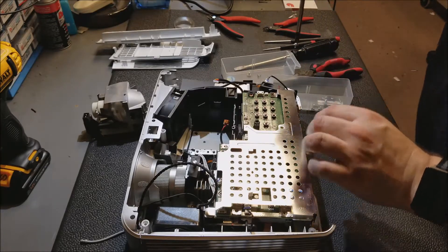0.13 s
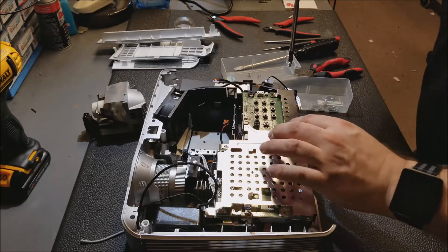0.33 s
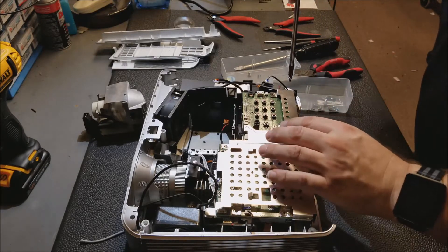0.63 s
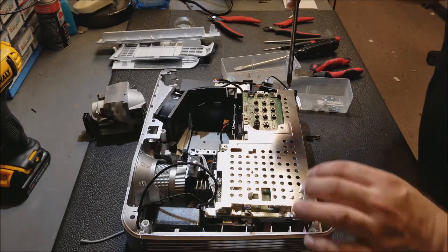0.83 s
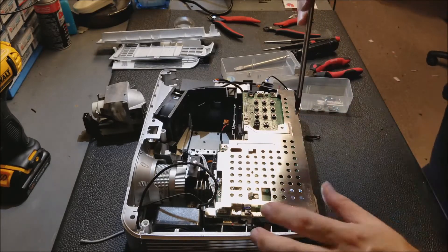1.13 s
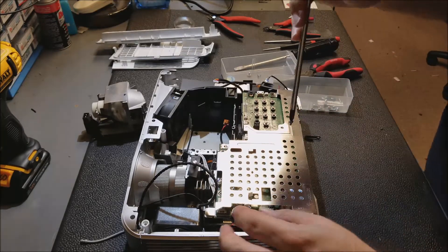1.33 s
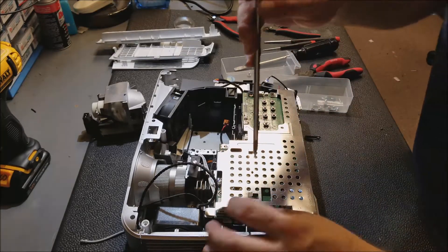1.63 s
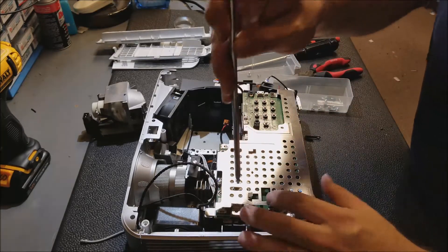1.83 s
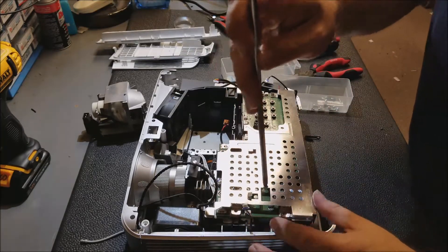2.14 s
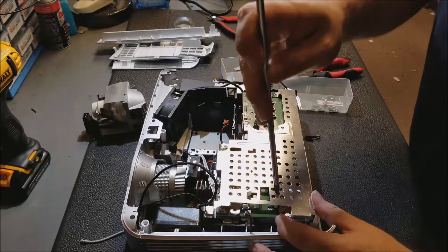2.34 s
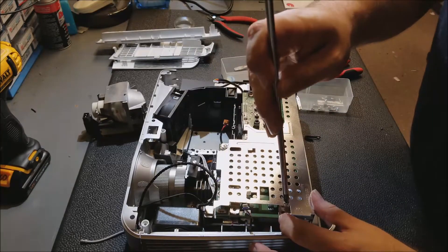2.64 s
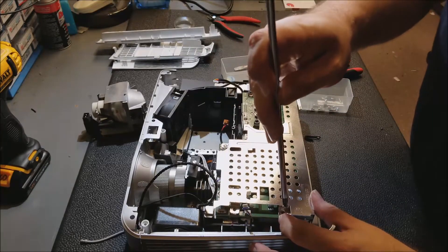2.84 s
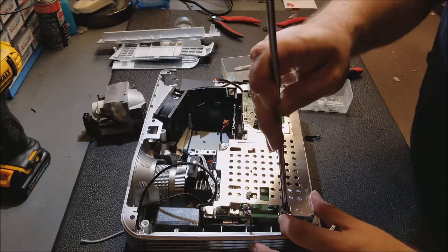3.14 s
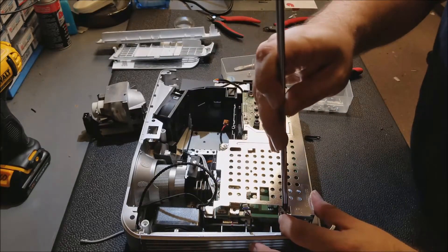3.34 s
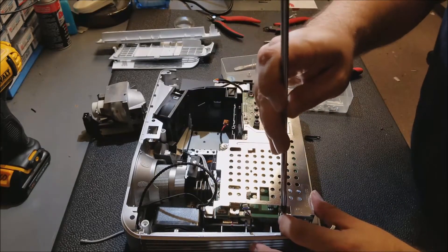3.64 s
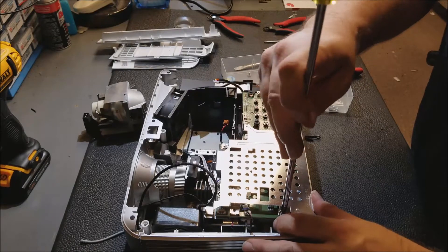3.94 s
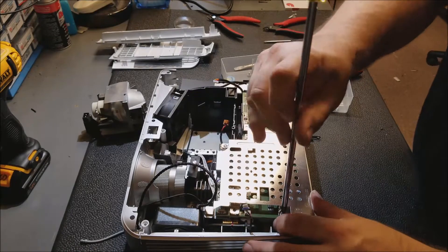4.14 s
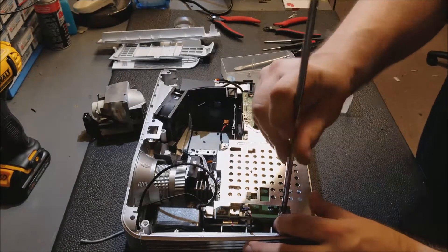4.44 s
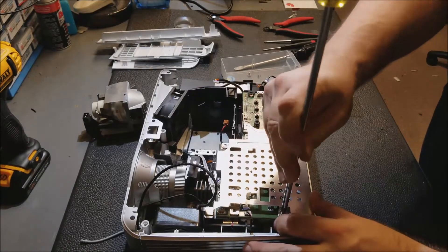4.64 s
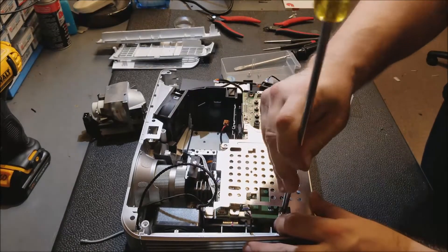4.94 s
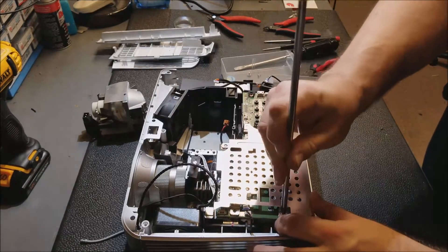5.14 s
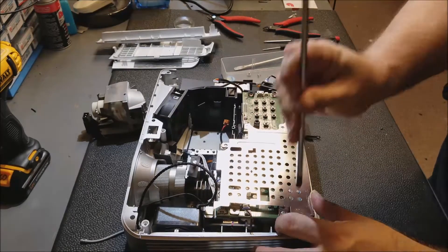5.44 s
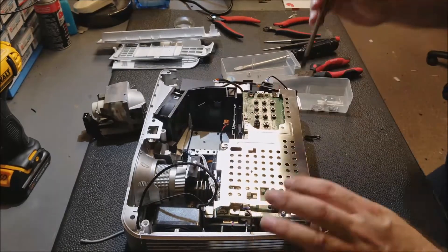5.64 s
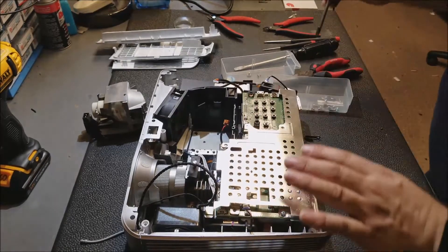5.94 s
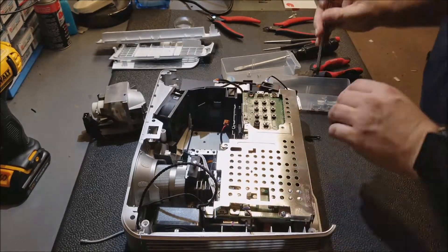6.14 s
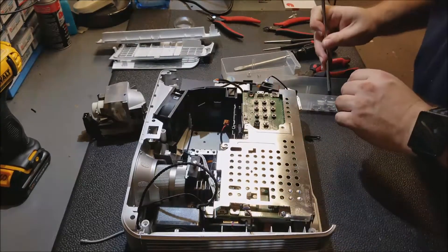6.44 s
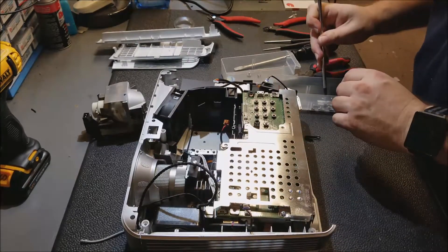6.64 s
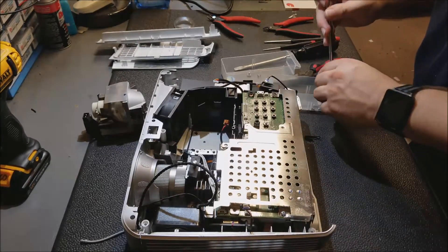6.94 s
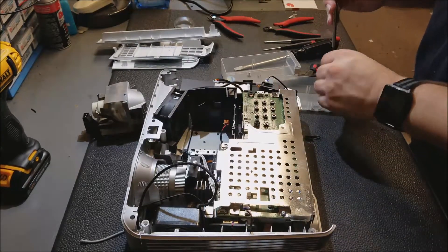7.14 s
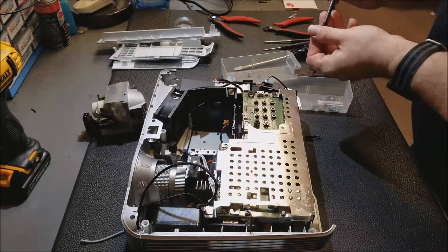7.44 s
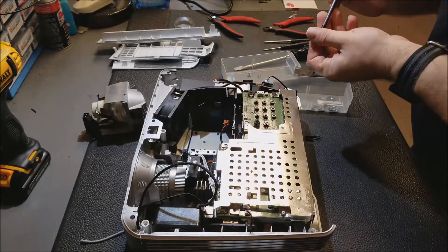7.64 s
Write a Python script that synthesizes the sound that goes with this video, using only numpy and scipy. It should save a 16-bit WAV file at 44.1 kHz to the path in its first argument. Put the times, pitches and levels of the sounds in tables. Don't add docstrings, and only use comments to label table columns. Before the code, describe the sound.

A long screwdriver ticks, scrapes and slips on small screws in a perforated steel cover, with two hard clacks over a low motor hum.

```python
import sys
import numpy as np
from scipy import signal
from scipy.fft import rfft, irfft, next_fast_len
from scipy.io import wavfile
from scipy.ndimage import uniform_filter1d

SR = 44100
rng = np.random.default_rng(int(sys.argv[2]) if len(sys.argv) > 2 else 0)


def output_pcm(signal):
    pcm = np.clip(np.atleast_2d(signal).T, -1, 1) * 32767
    wavfile.write(sys.argv[1], SR, np.round(pcm).astype(np.int16))


def attenuation_scalar(level_db):
    decades = np.asarray(level_db, float) / 20
    return 10 ** decades


N = 342954
t = np.arange(N) / SR


def screwdriver():
    ticks = steel(tick_forces(), damping=1.5)
    rubs = steel(rub_forces(), damping=2.05)
    return ticks + rubs + pings()


# (time [s], peak [dB], housing share [dB], plate share [dB], sizzle share [dB])
CRISP_TICKS = [(0.4497, -53.5, -20, -25, -21), (2.1745, -50, -18, -43, -34), (2.256, -42.5, -11, -20, -15),
               (3.1675, -48.5, -4.5, -14, -15), (3.494, -49, -12, -13, 5), (3.643, -37.5, -4, -7, 4.5),
               (3.7742, -53.5, -8, -10, -17), (3.9692, -25.5, -14, -13, -4.5), (4.351, -61, -4, -3, -42),
               (4.4167, -42, -6, -7, -30), (4.8827, -63.5, 9, 1, -4), (5.1715, -60.5, -16, 0, -1),
               (5.3925, -63.5, 16.5, -4, -18), (5.5277, -49, -19, -20, 1), (5.622, -37.5, -48.5, -30, -19),
               (7.2355, -62, -18, -1, -20.5)]
DRAGGED_TICKS = [
    (1.824, -58, -27, -28, -24),
    (2.4417, -67, 0, -30, 4),
    (3.5702, -61.5, 4, 3.5, -2),
    (3.5853, -50, 2, -1, -7),
    (3.8381, -61, -14, -20, -21),
    (4.6755, -25, -10.5, -5.5, 1),
    (6.568, -62.5, -20, -3, 4),
    (7.5631, -68.5, -8, -24, 11),
]


def tick_forces():
    push = np.zeros((4, N + SR))
    for rows, contact_s in (CRISP_TICKS, 0.0019), (DRAGGED_TICKS, 0.0058):
        for s, db, *shares_db in rows:
            shares = np.array([[0.008, *shares_db]]).T
            push[:, round(s * SR):][:, :SR // 8] += attenuation_scalar(db - 7.5 + shares) * swell(contact_s)
    return push[:, :N] * rng.standard_normal(N)


# (time [s], fade [s], level [dB], housing share [dB], plate share [dB])
SCRAPES = [
    (.47, 0.072, -65, -9, -3.5),
    (2.262, 0.11, -64.5, -1, -3),
    (3.175, 0.054, -56.5, -8.5, -3.5),
    (4.02, 0.053, -60.5, 7, -4),
    (4.355, 0.06, -76, 10, 1),
    (4.89, 0.043, -81, 2, 11),
    (5.174, 0.007, -69, -2, -15),
    (5.302, 0.1, -74.5, -36, -29),
    (5.532, 0.045, -57, -6, -17),
    (5.555, 0.017, -52.5, -2, 2),
]
TURNS = [(3.782, 0.052, -72.5, 5.5, 6), (3.844, 0.027, -76, 5, -16), (3.91, 0.14, -70, -2, 4),
         (4.102, 0.047, -55, -3.5, 6), (4.15, 0.051, -80.5, 17, 18), (4.425, 0.06, -59, -3.5, 7),
         (4.49, 0.048, -69, 11, 8), (5.0, 0.53, -99.5, 22, 19.5), (5.108, 0.046, -67, -20, -17),
         (5.44, 0.15, -79.5, 8.5, -1), (5.566, 0.041, -60, 5.5, 9), (5.858, 0.048, -76.5, 19, 10)]
SKIDS = [(1.375, 0.21, -72.5, 3, -0.5), (1.607, 0.042, -70, 0, 5), (1.68, 0.042, -78, 3, 8),
         (1.838, 0.03, -70.5, 1, 2.5), (1.905, 0.044, -70, -29, -23), (1.945, 0.027, -70.5, -29, -27),
         (2.18, 0.038, -70, 6, 3), (2.288, .04, -73.5, -11, 6), (2.35, 0.019, -68, -12, -2),
         (2.46, 0.044, -70, -9, -0.5), (3.235, 0.025, -63.5, -3.5, 0)]


def rub_forces():
    # strokes, rise time over fade time, sizzle share [dB]
    kinds = [(SCRAPES, 0.32, -3.5), (TURNS, 0.96, -4), (SKIDS, 0.88, 1.5)]
    pressure = np.zeros((4, N))
    for rows, rise, sizzle_db in kinds:
        for s, fade, db, *shares_db in rows:
            shares = np.array([[0.014, *shares_db, sizzle_db]]).T
            pressure += attenuation_scalar(db + shares) * stroke(s, fade, rise)
    fine = unit(uniform_filter1d(rng.standard_normal(N), size=40))
    coarse = unit(uniform_filter1d(rng.standard_normal(N), size=400))
    grit = attenuation_scalar(3.5 * fine + 1.77 * coarse)
    return pressure * unit(grit * patchy(count=1, patchy_db=-2.3))


# (pitch [Hz], width [Hz], level [dB])
STEEL_MODES = [(790, 27, -18), (1140, 210, -6), (1610, 44, 5), (1920, 200, 5.5), (2540, 220, -1.5),
               (4450, 1300, -1), (6200, 720, 1), (8000, 81, -2), (12000, 3600, 1)]
PART_REGIONS = [5000, 750, 2000, 12000]


def steel(force, damping):
    def region(f):
        ring = 0.74 + sum(attenuation_scalar(db) * peak(f, hz, damping * width_hz) for hz, width_hz, db in STEEL_MODES)
        return np.array([np.exp(-(np.log2((f + 1) / centre) / 0.86) ** 4) for centre in PART_REGIONS]) * ring

    power = np.mean(np.abs(region(np.linspace(0, SR / 2, 4000))) ** 2, axis=1, keepdims=True)
    return filtered(force, lambda f: region(f) / np.sqrt(power)).sum(axis=0)


# (time [s], peak [dB], pitch [Hz], contact [s])
RINGS = [(.452, -55, 6800, .007), (.477, -63.5, 2460, 0.0045), (0.447, -58, 8150, 0.0055),
         (2.26, -59, 790, 0.0068), (2.344, -55.5, 4170, 0.0031), (3.169, -47.5, 4820, 0.0032),
         (3.505, -63.5, 2470, 0.0072), (3.644, -36, 6100, 0.0011), (3.644, -44, 4000, 0.001),
         (3.645, -45, 790, 0.0035), (3.775, -52, 8000, 0.0013), (3.97, -30.5, 2540, 0.0019),
         (3.971, -45.5, 790, 0.009), (3.971, -45, 1114, 0.0085), (3.9689, -26.5, 5870, 0.001),
         (3.97, -28.5, 8000, 0.00081), (4.41, -46, 2500, 0.0091), (4.41, -54, 5800, 0.003),
         (4.677, -29, 6200, 0.0045), (4.678, -39.5, 2134, 0.011), (4.678, -42, 1554, .0076),
         (5.092, -61, 3060, 0.02), (5.172, -64, 2830, 0.0037), (5.118, -59, 4300, 0.0078),
         (5.17, -52, 3840, 0.00088), (5.385, -59, 1070, 0.017), (5.393, -58.5, 2700, 0.0018),
         (6.628, -59.5, 8000, 0.0018), (5.622, -36, 7480, 0.0022), (5.622, -36, 6380, .0031)]
CLANKS = [(1.611, -56.5, 1184, 0.0091), (1.841, -60.5, 1060, 0.0072), (2.311, -57.5, 3080, .019),
          (3.571, -49, 6900, .0012), (3.644, -29, 1630, 0.0021), (3.971, -26, 1650, 0.002),
          (3.972, -26, 1740, 0.0037), (3.971, -28.5, 2106, 0.0049), (4.351, -50, 1770, .0027),
          (4.68, -48.5, 490, .008), (4.43, -57.5, 410, .03), (4.89, -59.5, 1160, .017),
          (5.489, -57.5, 1120, 0.0063), (3.645, -38, 1063, 0.0046), (3.835, -58, 3440, 0.0098),
          (5.3, -65, 3500, 0.017), (3.493, -51, 5600, 0.0024), (3.645, -42.5, 2520, .002),
          (3.972, -44, 292, .01), (4.679, -39.5, 1546, .008), (5.546, -45, 6760, 0.0072),
          (5.528, -45, 7600, 0.0019), (.451, -60, 4400, .005), (5.54, -50, 12800, 0.0087),
          (5.6225, -42, 13000, 0.0037), (6.568, -47.5, 6400, 0.0013), (6.568, -45, 13000, .0015),
          (7.564, -61.5, 7800, .003)]
# broad, short pings, same columns; the 120 Hz row at 3.972 s pushes the bench top's low modes
BROAD_PINGS = [(3.493, -42, 11700, .001), (3.972, -48, 120, 0.0027), (4.678, -37, 11000, 0.0041),
               (5.813, -56, 660, 0.012), (5.85, -60, 804, .012), (5.815, -52.5, 198, .012),
               (5.837, -55, 1500, .003), (5.858, -62, 1390, 0.0036), (5.89, -62, 1520, .011),
               (6.569, -55, 10000, 0.0017), (7.5637, -51, 10000, .0005)]


def pings():
    out = np.zeros(N + SR)
    f = np.fft.rfftfreq(SR // 4, 1 / SR)
    for rows, q in (RINGS, 13.2), (CLANKS, 4), (BROAD_PINGS, 2.2):
        shake = rng.standard_normal(N + SR)
        for s, db, hz, contact_s in rows:
            push = swell(contact_s) * shake[round(s * 100) * 441:][:SR // 8]
            ping = irfft(rfft(push, SR // 4) * peak(f, hz, hz / q) ** 2)
            out[round(s * SR):][:len(ping)] += attenuation_scalar(db + 1) * ping / np.abs(ping).max()
    return out[:N]


# (time [s], peak [dB])
THUDS = [(2.177, -59), (3.171, -59), (3.641, -50), (3.969, -36.5), (4.097, -48.5), (4.415, -48.5),
         (4.446, -51), (4.486, -49.5), (4.675, -43.5), (5.389, -59.5), (5.53, -47.5), (5.561, -57),
         (5.813, -51), (5.851, -52), (5.88, -56)]
# (pitch [Hz], width [Hz], level [dB])
BENCH_MODES = [(111, 19, 8.5), (135.5, 38, 5.5), (237, 69, -1.5), (333, 62, 1.5), (448, 23, 4),
               (515, 12, -9)]


def bench():
    blows = np.zeros(N + SR)
    for s, db in THUDS:
        blows[round(s * SR):][:SR // 8] += attenuation_scalar(db + 18.5) * swell(0.0032)

    def wood(f):
        return sum((-1) ** k * attenuation_scalar(db) * peak(f, hz, width_hz)
                   for k, (hz, width_hz, db) in enumerate(BENCH_MODES))

    return filtered(blows[:N] * rng.standard_normal(N), wood)


# (time [s], fade [s], level [dB])
PALM_SLIDES = [
    (0.63, 0.97, -64),
    (0.94, 0.83, -65),
    (1.03, 0.32, -56.5),
    (1.2, 0.42, -60.5),
    (1.36, 0.14, -58),
    (1.616, 0.07, -59),
]


def palm():
    rub = patchy(count=1, patchy_db=-1.5)[0]
    skin = filtered(rub, lambda f: peak(f, 239, 150) ** 2 + 0.36 * peak(f, 385, 115) ** 2)
    return sum(attenuation_scalar(db - 4.5) * stroke(s, fade, rise=0.052) for s, fade, db in PALM_SLIDES) * unit(skin)


# (pitch [Hz], level [dB])
HUM = [(58.5, -48.5), (58.82, -54)]
# (pitch [Hz], level [dB])
BUZZ = (360.7, -79)
# (pitch [Hz], width [Hz], level [dB])
DRONES = [(54.46, 1.55, -61), (75, 4.6, -69.5), (117.7, 0.99, -60), (124.7, 5.2, -61.5)]
WHINES = [1087, 1270]
# (time [s], lower whine [dB], upper whine [dB])
WHINE_SWELL = [(0, -77, -78), (1, -77, -78), (2.2, -81, -80), (4.4, -81, -79.5), (5.4, -78, -78.5),
               (6.2, -81, -79.5), (7.78, -82, -78.5)]


def motor():
    loudest_s = 2.0
    hum = sum(2 ** .5 * attenuation_scalar(db) * np.cos(2 * np.pi * hz * (t - loudest_s)) for hz, db in HUM)
    buzz_hz, buzz_db = BUZZ
    hum = hum + 2 ** .5 * attenuation_scalar(buzz_db) * np.sin(2 * np.pi * buzz_hz * t)
    for hz, width_hz, db in DRONES:
        drone = filtered(rng.standard_normal(N), lambda f: peak(f, hz, width_hz) ** 2)
        hum = hum + attenuation_scalar(db) * unit(drone)
    lag_s = np.array([[-6e-5], [6e-5]])
    whines = sum(attenuation_scalar(db) * np.sin(2 * np.pi * hz * (t + lag_s))
                 for hz, db in zip(WHINES, curves(WHINE_SWELL)))
    return hum + whines


# (pitch [Hz], t60 [s])
SHOP_T60 = [(300, 0.39), (2000, 0.33), (7000, 0.22), (14000, 0.24)]


def shop(x):
    hz, s, z = signal.stft(rng.standard_normal((5, 2, SR // 2)), SR, nperseg=256)
    late = attenuation_scalar(-60 * s / along(SHOP_T60, hz)[:, None])
    early = 0.85 * attenuation_scalar(-60 * s / 0.12)
    tails = signal.istft(z * (late + early), SR, nperseg=256)[1]
    place = (t // .11).astype(int) % len(tails)
    wet = np.zeros((2, N + tails.shape[-1] - 1))
    for k, tail in enumerate(tails):
        wet += signal.fftconvolve(x[None] * (place == k), tail / np.linalg.norm(tail[0]), axes=1)
    return np.pad(wet, ((0, 0), (90, 0)))[:, :N]


# (pitch [Hz], density [dB per Hz])
RUMBLE = [(12, -55), (22, -4.5), (45, -1.5), (96, -6), (129, -2.5), (209, -16), (330, -19.5), (440, -29.5),
          (560, -33.5), (1000, -37.5), (1180, -32.5), (1350, -35.5), (3000, -46.5), (6600, -120)]
# (pitch [Hz], likeness [-1 to 1])
RUMBLE_ALIKE = [(60, 1.0), (130, 0.92), (290, 0.82), (640, 0.075), (1410, 0.14), (3100, -0.58),
                (6820, -0.09), (15000, -0.08)]


def room_rumble():
    def mid_side(hz):
        turn = np.arccos(np.clip(along(RUMBLE_ALIKE, hz), -1, .99)) / 2
        return attenuation_scalar(along(RUMBLE, hz)) * [np.cos(turn), np.sin(turn)]

    mid, side = filtered(patchy(count=2, patchy_db=0.76), mid_side)
    return attenuation_scalar(-56) * unit(np.array([mid + side, mid - side]))


# (pitch [Hz], density [dB per Hz])
HISS = [(880, -65), (1500, -3.5), (2270, -11), (2440, -8.5), (5600, -12.5), (14800, -11.5), (16000, -18)]


def microphone_hiss():
    return attenuation_scalar(-76.0) * unit(filtered(rng.standard_normal((2, N)), lambda hz: attenuation_scalar(along(HISS, hz))))


def swell(contact_s):
    x = np.arange(SR // 8) / SR / max(contact_s, 2e-4)
    return x * np.exp(1 - x)


def stroke(s, fade, rise):
    climb = (s - t) / (fade * max(rise, .02))
    return attenuation_scalar(-20 * np.minimum(np.maximum((t - s) / fade, climb), 5))


def patchy(count, patchy_db):
    z = signal.stft(rng.standard_normal((count, N)), nperseg=512)[2]
    field = uniform_filter1d(rng.standard_normal(z.shape[1:]), 5, 0)
    field = uniform_filter1d(field, 8, 1)
    return unit(signal.istft(z * attenuation_scalar(patchy_db * unit(field)), nperseg=512)[1][:, :N])


def peak(f, hz, width_hz):
    return 1j * f * width_hz / (hz * hz - f * f + 1j * f * width_hz)


def filtered(x, response):
    m = next_fast_len(N + SR // 2)
    return irfft(rfft(x, m) * response(np.fft.rfftfreq(m, 1 / SR)), m)[..., :N]


def along(points, hz):
    f, v = np.transpose(points)
    return np.interp(np.log(hz + 1), np.log(f + 1), v)


def curves(rows):
    s, *cols = np.transpose(rows)
    return np.array([np.interp(t, s, c) for c in cols])


def unit(x):
    return x / np.sqrt(np.mean(x ** 2) + 1e-20)


def scene():
    work = screwdriver()
    body = palm() + bench()
    lag_s, lag_top = 9e-5, 1.8

    def arrival(f):
        lag = lag_top * np.tanh(2 * np.pi * f * lag_s / lag_top)
        return np.exp(-1j * lag * np.array([[1], [0]]))

    direct = attenuation_scalar([[-2], [1.5]]) * attenuation_scalar(-1.46) * filtered(work + body, arrival)
    echo = attenuation_scalar([[-1], [1]]) * attenuation_scalar(-2.5) * shop(work + attenuation_scalar(-0.5) * body)
    return direct + echo + motor() + room_rumble() + microphone_hiss()


def band_limit(x):
    return signal.sosfilt(signal.butter(12, 16540, fs=SR, output="sos"), x)


def record(dry):
    mix = filtered(dry, lambda hz: hz < 16000)
    return band_limit(mix)


dry = scene()
out = record(dry)
output_pcm(out)
```